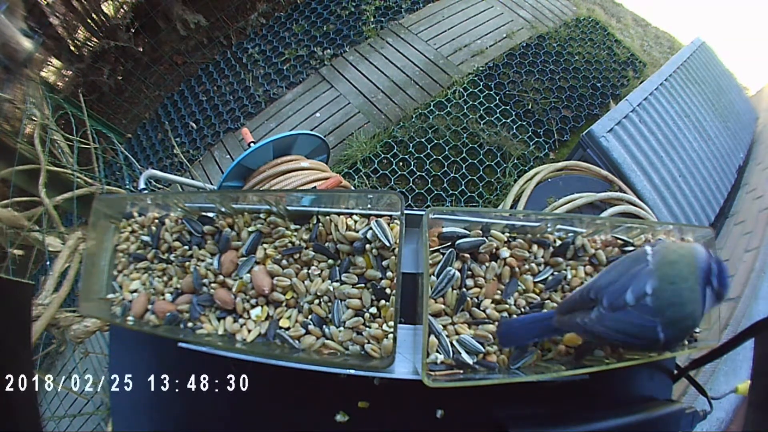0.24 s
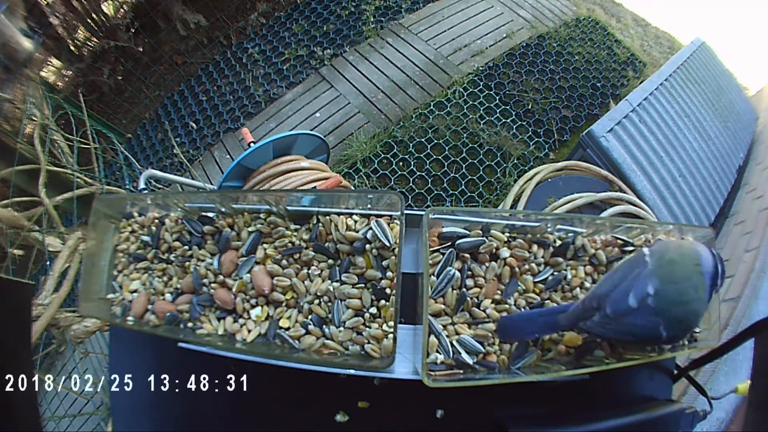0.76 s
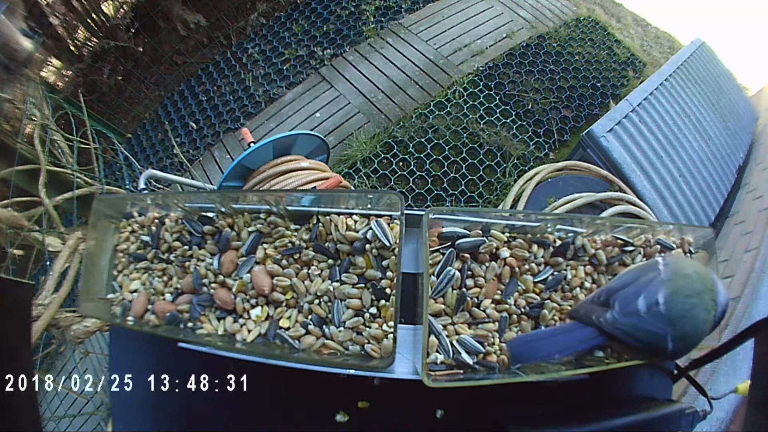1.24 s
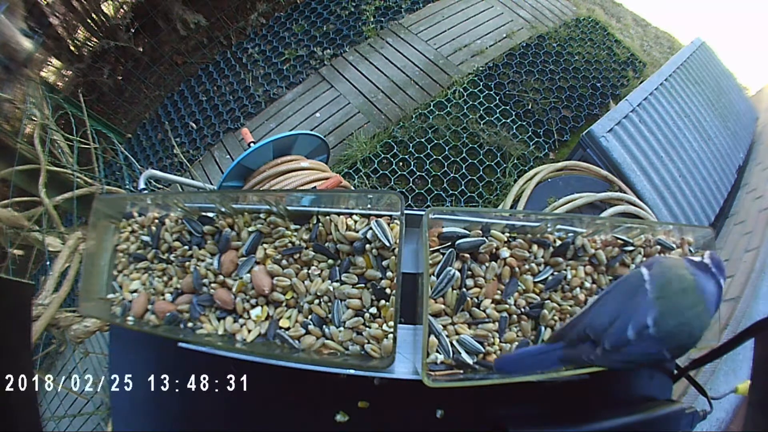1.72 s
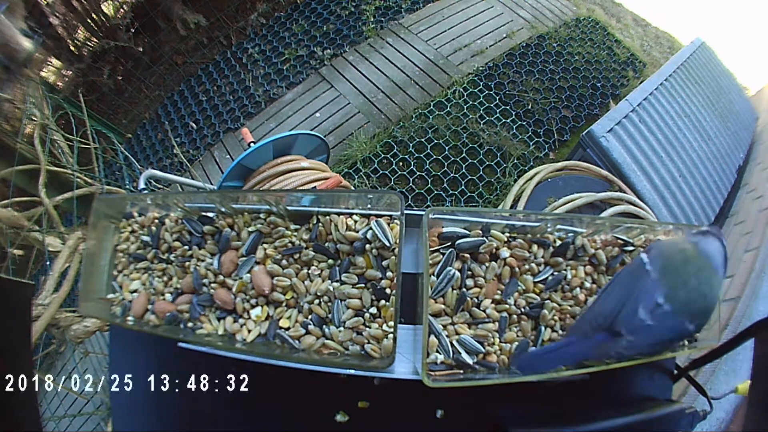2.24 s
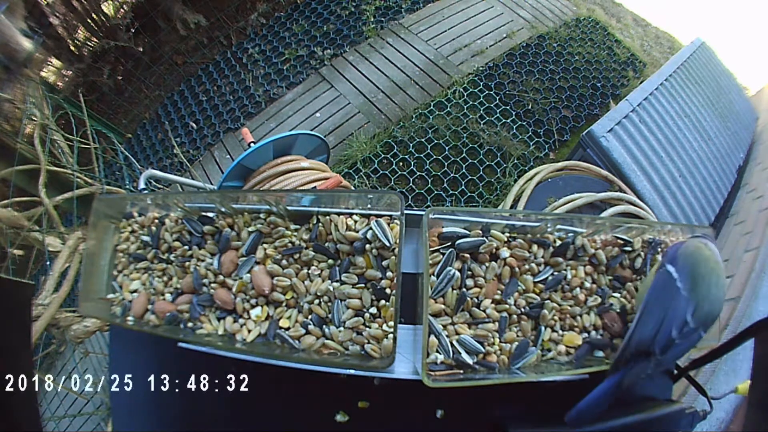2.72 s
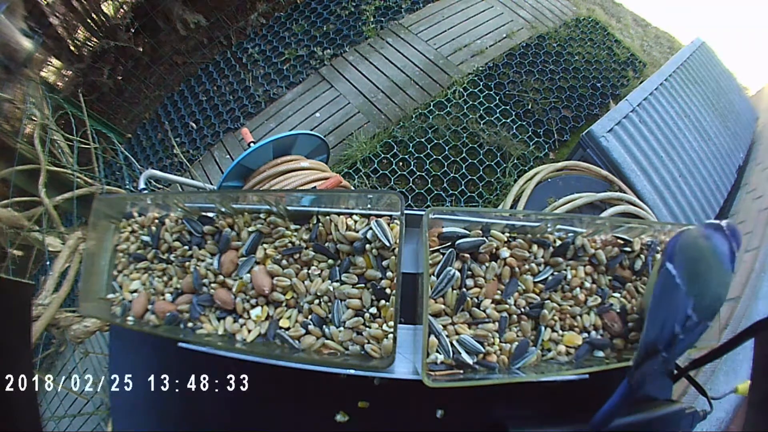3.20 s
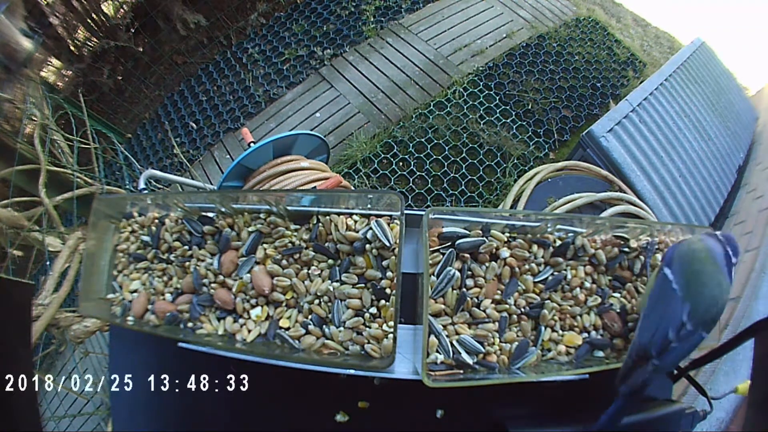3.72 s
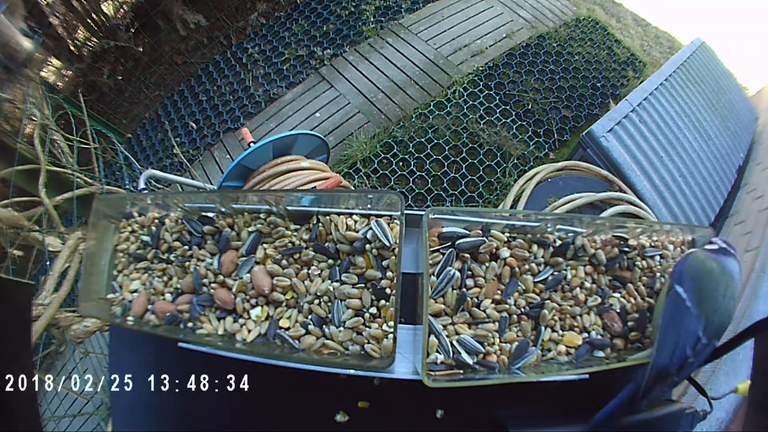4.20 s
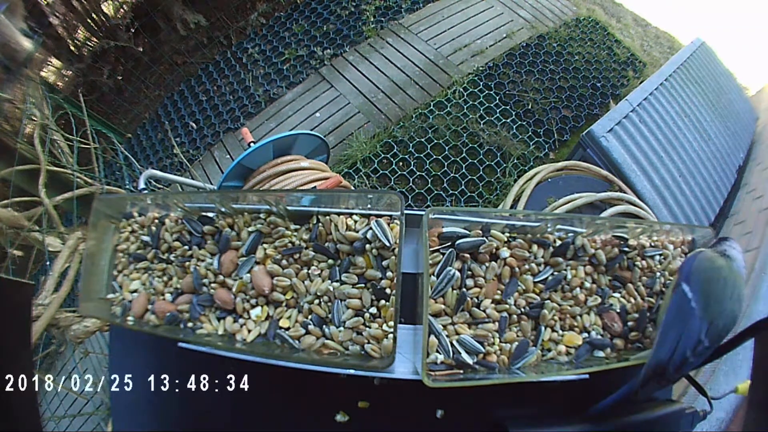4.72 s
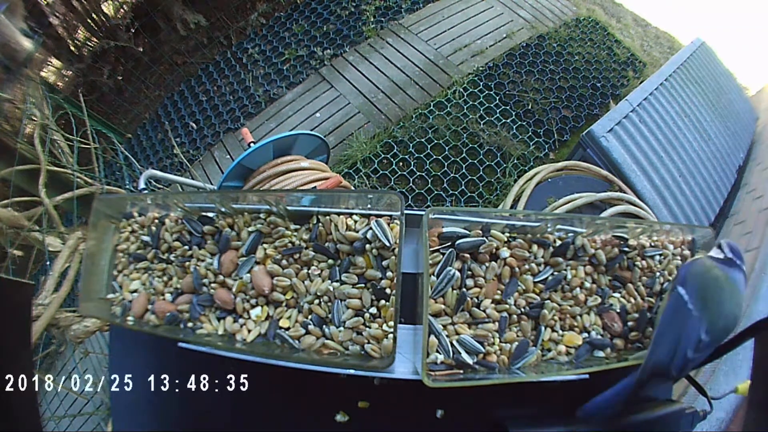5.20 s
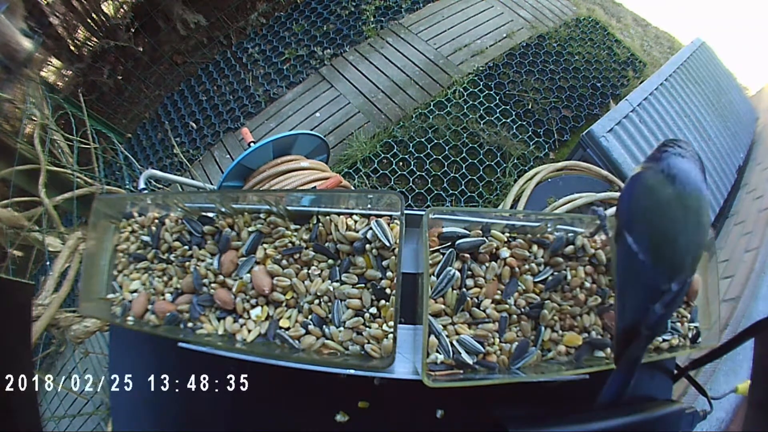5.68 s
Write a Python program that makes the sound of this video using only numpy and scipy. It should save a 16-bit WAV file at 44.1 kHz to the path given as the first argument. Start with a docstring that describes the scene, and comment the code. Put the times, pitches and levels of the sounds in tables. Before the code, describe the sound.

Outdoors at a garden feeder, very close microphone. Low wind rumble and far traffic with faint hiss. A small bird taps a plastic tray sparsely, then gives one very loud hard knock just before two seconds. Gusts buffet, light ticks follow, and a dense clatter of hopping ends with a tiny thin call and squeak.

```python
"""Wind buffets a single microphone as noise in two bands, over far traffic, hiss and a chattering sizzle.
A small bird pecks and hops on plastic seed trays: each contact excites damped modes of the tray.
Near 1.8 s the hardest peck overloads the input and rocks the feeder, a decaying slow sine.
Near 2.9 s a gust moans in the hollow feeder, as band-limited noise; near 5.3 s a hop rocks it again.
At 5.56 s the bird gives one thin call, a gliding tone, while a sliding claw squeaks below it."""
import sys
import numpy as np
from scipy import signal
from scipy.fft import rfft, irfft, next_fast_len
from scipy.io import wavfile
from scipy.ndimage import uniform_filter1d, map_coordinates

SR = 44100
rng = np.random.default_rng(int(sys.argv[2]) if len(sys.argv) > 2 else 0)


def file_out(sig):
    """Save sig as 16-bit WAV at sys.argv[1]."""
    # one column per channel
    cols = np.atleast_2d(sig).T
    # limit, then scale
    lim = np.clip(cols, -1, 1)
    pcm = np.round(lim * 32767).astype(np.int16)
    wavfile.write(sys.argv[1], SR, pcm)


N = 262395

# Contacts of bill, claws and seeds. Each row: start in seconds, peak of the rim modes in dB, then
# weight, hollowness, snap, hardness and tick in dB, and ringing time as a share of the free tray's.
TAPS = [(0.2475, -39, -9, -4, -5, -19, -14, 0.71), (0.345, -47, -7, -4, -13, -1, 7, 1),
        (0.6675, -38.5, -12, -6, -13, -19, -20, 1), (0.9174, -32, -10, -11, -9, -8, 1.5, 0.5),
        (0.951, -36, -18, -8, -7, -7, -3.5, 0.98), (1.0998, -23, -3, -0.5, -22, -15.5, -21, 0.29),
        (1.1065, -21.5, -25, -9, -20, -19, -17, 0.53), (1.1274, -44, 2, -17, -18, -14, -18, .8),
        (1.155, -47, -2, -4, -22, -19, -19, 0.9), (1.2898, -15.5, -7, -5.5, -13, -21.5, -16.5, 0.5),
        (1.2978, -33, 2, -7, -14, -18, -15, .7), (1.3838, -14, -9, -8, -14, -25.5, -22.5, 0.49),
        (1.7818, -29.5, -7, 6, 5, 2, -2.5, 1), (1.792, 3, -24, -0.5, -9.5, -18, -21.5, 0.98),
        (1.818, -17.5, -22, -14, -7, -3.5, -5, 0.76), (1.8284, -36, -26, -20, -14.5, -10.5, -15, 0.62),
        (2.2838, -28, -30, -24, -9, -19, -18.5, .9), (2.2923, -22.5, -24.5, -21.5, -11.5, -17.5, -7.5, .85),
        (2.354, -28, -8, -14, -2.5, -23, -22, 1), (2.3604, -30.5, -9, -23, -4, -11, -16.5, 0.81),
        (2.7535, -25, -15, 3, -26, -35, -35, 0.76), (2.7831, -37, 6.5, 2.5, -17, -16, -15.5, 0.61),
        (2.915, -19.5, -18, 9.5, -12.5, -28, -30.5, 0.78), (2.9628, -55, -7.5, -11.5, -15, -23, -26, .9),
        (3.692, -29, -10, -4, -7, -20.5, -18, 1), (3.9105, -43, 8, 6, -4, -20, -18, 0.99),
        (4.059, -39, -1, -12, -20, -25, -25, 1), (4.171, -41.5, 6, 1, -5, -28, -27, .9),
        (4.2363, -48, -13, -5, -6, -15, -16, .85), (4.36, -42.5, -11, 2, -4, -18, -18, 0.76),
        (4.3916, -39, -4, -3, -26, -28, -26, 0.71), (4.543, -33.5, 6, -1, -6.5, -16, -22, 0.54),
        (4.7518, -47.5, -5, -5, 0, -4, -12, 0.74), (4.7779, -44.5, 11, 2, -10, -17, -19, 0.95),
        (4.8223, -41.5, 8.5, -5, -3, -16, -20, 0.81), (5.027, -40, -4, -1, -7, 1.5, -5, 0.66),
        (5.0483, -47, -4, 3, -9, -7, 2.5, .8), (5.1376, -31.5, -0.5, -4.5, -8.5, -14, -17, 0.73),
        (5.2624, -25.5, -8, 5, -8, -22, -11, 1), (5.2785, -38, -7, 13, -2, -7, -8.5, 1),
        (5.3005, -44, -10, 2, -8, -6, -2, .8), (5.3059, -19, -21, -14, -12, -2, -2, 0.61),
        (5.3182, -22.5, -19, 11, -1, -10, 1, 0.49), (5.3214, -5, -19, -1.5, -22, -15.5, -21, 1),
        (5.3472, -21, 0.5, 8.5, -18, -25, -27, 1), (5.3561, -17.5, 3, -13, -14, -17, -18, 0.87),
        (5.383, -18, -4, -10, -4.5, -10, -8, 0.99), (5.3961, -18, -8, -11, -14, -19, -9, 0.62),
        (5.403, -16.5, -14, -14, -17, -27, -26, 0.82), (5.4068, -40, -11, -9, -7, 0, -2, 0.45),
        (5.4199, -32, -12, -8, -9, -11, -6, 0.65), (5.4435, -46, -8, -1, 4, -8, 0, 0.89),
        (5.4714, -14, -14, -6.5, 8.5, 3.5, -6, 0.56), (5.4764, -10.5, -10, -9.5, 5.5, 1, -11.5, 0.61),
        (5.5268, -38, -15, -10, -16, -13, -14, 0.83), (5.532, -47, -8, -8, -16, -12, -13, .8),
        (5.578, -43.5, -10, -4, 9, 9, 12.5, 1), (5.5936, -26, 7, -6.5, -8, -22, -17, 0.54),
        (5.6054, -54, -2, -5, -3, -4, 8.5, .8), (5.6131, -34, 4, 3.5, -16, -22, -16.5, 0.69)]
# Claws and husks dragged over the plastic. Each row: start in seconds, length in seconds,
# rms of the rim modes in dB, then weight, hollowness and hardness in dB.
SCRAPES = [(0.884, 0.068, -54, 0, -19, -11), (1.764, 0.059, -43.5, -14, -5, -4),
           (1.787, 0.02, -29, -21, -8, -17), (1.825, 0.022, -47.5, 1, -12, -12),
           (2.349, 0.042, -46.5, 1, -7, -21.5), (2.86, 0.13, -48, -10, 3, -23),
           (3.644, 0.085, -56.5, -2, 8, -9), (3.888, 0.058, -61, 12.5, 11, -8),
           (4.051, 0.038, -50.5, -3, -1.5, -23.5), (4.161, 0.024, -52, -10, -2, -20),
           (4.192, 0.07, -53.5, -11, 2.5, -15), (4.349, 0.027, -54, -9, -1, -15),
           (4.761, 0.13, -57.5, 9, 1, -15), (4.997, 0.05, -51.5, 5.5, 1, -11),
           (5.402, 0.031, -47, -1, -1, -10), (5.431, 0.075, -57.5, 11, 0, 4),
           (5.245, 0.033, -47, 5, -6, -10.5), (5.28, 0.025, -40, -20, -5, -10),
           (5.3, 0.017, -35, -5, 1, -2), (5.326, 0.051, -37.5, 2.5, -8, -15.5),
           (5.387, 0.017, -43, -4, 7, -2), (5.551, 0.046, -42, -9, -14, -14),
           (5.601, 0.029, -53, 10, -4, -4)]
# Modes of the free tray. Each row: frequency in Hz, level within its family in dB,
# time to decay by 60 dB in seconds.
TRAY_MODES = [(215, -11.5, 0.03), (376, -10.5, 0.03), (507, -4, 0.019), (610, -9, 0.033),
              (746, -4.5, 0.015), (1101.4, 0, 0.041), (1397, -13, 0.041), (1694, 1, 0.019),
              (1892, -1.5, 0.012), (1970, 0.5, 0.016), (2194, 2.5, 0.015), (2400, -3, 0.021),
              (2836, -14.5, 0.016), (3350, -12.5, 0.011), (3863, 1, 0.0062), (3920, -1.5, 0.0096),
              (4300, -8.5, 0.0052), (4760, -7, 0.0046), (5250, -3.5, 0.004), (5840, 0.5, 0.007),
              (6300, -3, 0.011), (6900, -1, 0.0057), (7270, -1.5, 0.0054), (7390, 1, 0.0049),
              (10340, 7.5, 0.0027), (11470, 2.5, 0.0032), (11100, 6.5, 0.002), (12600, -4.5, 0.0022)]
# Edges in Hz between the families of modes: thud, ring, wall, rim, snap, click and tick.
FAMILY_EDGES_HZ = [850, 1300, 1950, 3000, 5000, 8000]
# Time constant in ms of the rise of each family; the hollow ring builds up late.
SWELL_MS = [0.44, 1.88, 0.18, 0.22, 0.36, 0.17, 0.029]
# Drive of each family by the chatter of a 0 dB touch, in dB relative to the first push.
# Slow modes feel a touch as one push, quick ones feel its chatter.
CHATTER_DB = [-46, -52, -38, -34, -29, -28, -28]
# Initial drive of each family by rattling seeds, in dB relative to the first push.
RATTLE_DB = [-29.5, -53, -29.5, -28.5, -37, -36.5, -32]
# How a family follows a control. Each: constant in dB, share of the control (a ratio).
WALL_FOLLOWS_HOLLOWNESS = (0, 0.67)
CLICK_FOLLOWS_HARDNESS = (0.9, 0.93)
DRAG_SNAP_FOLLOWS_HARDNESS = (-1.2, 0.43)
DRAG_TICK_FOLLOWS_HARDNESS = (-0.77, 0.94)
# Rocking of the feeder. Each row: start in seconds, initial level in dB, frequency in Hz.
JOLTS = [(1.834, -13.5, 15.8), (5.339, -7, 19)]
# Bird call, then squeak of a claw sliding to rest. Each row: time in seconds,
# centre of the pitch in Hz, centre of the rms level in dB.
CALL = [(5.558, 6575, -65), (5.566, 7451, -48), (5.572, 7640, -43), (5.586, 7713, -46), (5.598, 7357, -40),
        (5.605, 6902, -63)]
SQUEAK = [(5.562, 3800, -41), (5.569, 3330, -32), (5.574, 3350, -43), (5.578, 2710, -45),
          (5.584, 2290, -28.5), (5.592, 2200, -55)]
# Moan of the feeder in a gust. Each row: time in seconds, rms level in dB.
MOAN = [(2.83, -77), (2.865, -36.5), (2.92, -41), (2.96, -45), (3.02, -53), (3.06, -70)]
# Gusts. Each row: time in seconds, buffet level in dB, flutter in dB relative to the buffet.
WIND = [(0.0, -37.5, 0), (0.23, -22, -11), (0.46, -45.5, 6), (0.49, -23, -11.5), (1.03, -24, -15.5),
        (1.35, -40, 2.5), (1.74, -24.5, -11), (2.17, -22, -7.5), (2.22, -13, -6.5), (2.28, -30, -8),
        (2.77, -24, -11.5), (2.835, -17.5, -7), (2.872, -16, -16.5), (2.94, -14, -9), (2.98, -29, -6),
        (3.04, -18.5, -5), (3.1, -28.5, -2.5), (3.148, -11.5, -3), (3.194, -21, -1.5), (3.25, -10, -6),
        (3.32, -26.5, -1), (3.35, -20, -6.5), (3.42, -37, -3), (3.5, -19, -14), (3.58, -29, -10.5),
        (3.75, -15, -18), (3.84, -32, -7.5), (4.24, -23.5, -13.5), (4.57, -39.5, 0), (4.96, -34, -11),
        (5.01, -21.5, -9), (5.31, -28, 0.5), (5.36, -23, -3), (5.44, -23.5, -19), (5.59, -38.5, -7),
        (5.9, -41.5, 1)]
# Noise spectra, of which only the shape counts. Each row: frequency in Hz, relative density in dB per Hz.
MOAN_BAND = [(220, -48.5), (320, -3), (380, -3), (450, -1.5), (520, -9), (700, -65)]
BUFFET = [(1.8, -32), (3.0, -4.5), (32, 8), (47, -5), (70, -10), (91, -36), (150, -120)]
FLUTTER = [(32, -77), (55, 4.5), (113, -11.5), (161, -20), (230, -31), (300, -40.5), (390, -49.5),
           (660, -120)]
TRAFFIC = [(59, -3), (100, -8), (141, -5), (167, -9.5), (287, -7), (544, -5.5), (858, -16.5), (1050, -6.5),
           (1140, -17.5), (1560, -16.5), (1700, -12), (1820, -13.5), (1960, -15.5), (2320, -24),
           (3000, -34.5), (3900, -62.5), (6600, -120)]
HISS = [(1470, -35), (2500, -8.5), (2780, -2), (3100, -1), (5540, -5), (6080, -3.5), (6610, -5.5),
        (7760, -8.5), (11600, -10.5), (13700, -9), (14400, -19.5), (15600, -20)]
SIZZLE = [(8500, -37), (9400, -10.5), (9900, 2), (10300, -11), (11000, -6), (11800, -20), (12400, -8),
          (12900, -1.5), (13600, -1.5), (14100, -7.5), (14800, -21.5)]
# Rises of the sizzle. Each row: start in seconds, length in seconds, gain over its rest in dB.
SIZZLE_SPELLS = [(1.062, .63, 17), (3.268, 0.66, 18.5), (5.396, 0.73, 17.5)]
# Faint difference between the channels in loud moments. Each row: frequency in Hz, level relative to the sound
# common to both channels in dB.
WIDTH_DB = [(60, -70.5), (200, -44.5), (600, -22.5), (2400, -20), (8000, -16.5), (15000, -2)]

CONTACT_MS = 0.37  # time constant of a 0 dB touch
SOFTER_PER_DB = 0.08  # weaker touches are softer: they last longer and chatter more
RATTLE_T60_S, ROCK_T60_S = 0.046, 0.33
SETTLE_S = 0.028  # the bird's weight settles on the tray and chokes what still rings
SOFT_HZ = 14200  # the tray radiates little above this
LUMPS_DB, LUMPS_PER_S = 2.5, 10  # single eddies swell and sink around the gusts
TRAFFIC_DB = -44.5
HISS_DB, SIZZLE_DB = -60, -76.5  # before the treble gain; sizzle also before spells and bursts
THINNING_AT_DB = -18  # level of the wandering curve around which the treble gain turns down
BURST_S, BURST_MID_S, CLICKS_PER_BURST = .04421, 1.4379, 11  # cycle, centre of one burst, clicks a cycle
BURST_SHARE, BUZZ_DEPTH = 0.72, 0.41  # part of each cycle that sounds, depth of the clicks
PAUSE_DB = -9  # pauses relative to bursts
OFFSET = 0.042  # converter offset, share of full scale
TOP_HZ = 15730


def taps():
    """Impact excitation: a first push, a chatter of force during contact, then a brief rattle of loose seeds."""
    out = np.zeros(N + SR)
    t = np.arange(SR // 16) / SR
    rattle = amp(np.transpose([RATTLE_DB]) - 60 * t / RATTLE_T60_S)
    for start, db, weight_db, hollow_db, snap_db, hard_db, tick_db, ringing in TAPS:
        softness = np.exp(-SOFTER_PER_DB * db)
        contact_s = softness ** .5 * CONTACT_MS / 1000
        chatter = amp(np.transpose([CHATTER_DB])) * softness * np.exp(-(t / contact_s) ** 2)
        force = rng.standard_normal(len(t)) * (chatter + rattle)
        force[:, 0] += 1  # the first push
        rows = signal.fftconvolve(families(ringing), force, axes=1)
        rows /= np.abs(rows).max(axis=1, keepdims=True)
        sound = amp(db + colour(weight_db, hollow_db, snap_db, hard_db, tick_db)) @ rows
        out[round(start * SR):][:len(sound)] += sound
    return out[:N]


def scrapes():
    """Stick-slip friction: a drag is a dense uneven run of tiny slips under one stroke."""
    out = np.zeros(N + SR)
    for start, length, db, weight_db, hollow_db, hard_db in SCRAPES:
        n = round(length * SR)
        unevenness = amp(6.5 * np.minimum(rng.exponential(size=n), 4))
        slips = rng.standard_normal(n) * unevenness * np.sqrt(np.hanning(n))
        rows = signal.fftconvolve(families(ringing=0.43), slips[None], axes=1)
        rows /= np.sqrt(np.sum(rows ** 2, axis=1, keepdims=True) / n)
        snap_db = follow(DRAG_SNAP_FOLLOWS_HARDNESS, hard_db)
        tick_db = follow(DRAG_TICK_FOLLOWS_HARDNESS, hard_db)
        sound = amp(db + colour(weight_db, hollow_db, snap_db, hard_db, tick_db)) @ rows
        out[round(start * SR):][:len(sound)] += sound
    return out[:N]


def families(ringing):
    """Modal superposition: the tray's answer to one blow is a sum of damped sines, one row a family.

    The spot struck shifts strengths and pitches; the bird's grip shortens the ringing."""
    hz, db, t60 = np.transpose(TRAY_MODES)[:, :, None]
    family = np.searchsorted(FAMILY_EDGES_HZ, hz[:, 0])
    t = np.arange(SR // 20) / SR
    level_db = 1.5 * rng.standard_normal(hz.shape)
    shift = .006 * rng.standard_normal(hz.shape)
    swell = (1 - np.exp(-t / (np.array(SWELL_MS)[family, None] / 1000))) ** 2
    decay = amp(db + level_db - 60 * t / (t60 * ringing))
    choke = np.exp(-(t / SETTLE_S) ** 2)
    sign = (-1) ** np.arange(len(hz))[:, None]  # neighbours in opposite phase fill the valleys between them
    modes = sign * decay * swell * choke * np.sin(2 * np.pi * hz * (1 + shift) * t)
    membership = family == np.arange(len(SWELL_MS))[:, None]
    return membership @ modes


def colour(weight_db, hollow_db, snap_db, hard_db, tick_db):
    """Selective excitation: levels relative to the rim; weight feeds the thud, hollowness ring and wall."""
    wall_db = follow(WALL_FOLLOWS_HOLLOWNESS, hollow_db)
    click_db = follow(CLICK_FOLLOWS_HARDNESS, hard_db)
    return np.array([weight_db, hollow_db, wall_db, 0, snap_db, click_db, tick_db])


def follow(law, db):
    """Linear law: a constant plus a share of the controlling level."""
    constant_db, share = law
    return constant_db + share * db


def jolts():
    """Damped oscillation: the hardest peck and the hop set the whole feeder swinging, a dying slow sine."""
    start, db, hz = np.transpose(JOLTS)[:, :, None]
    t = np.maximum(np.arange(N) / SR - start, 0)
    return np.sum(amp(db - 60 * t / ROCK_T60_S) * np.sin(2 * np.pi * hz * t), axis=0)


def call():
    """Frequency modulation: one thin arched whistle, over the rough falling squeak of a sliding claw."""
    return glide(CALL, rough=.02) + glide(SQUEAK, rough=1.1)


def glide(rows, rough, shake=450):
    """Phase is the integral of frequency: a tone follows the rows; roughness shakes its pitch and size."""
    hz, db = curves(rows)
    t = np.arange(N) / SR
    first, last = rows[0][0], rows[-1][0]
    gate = np.clip(np.minimum(t - first, last - t) / 0.0034, 0, 1)
    phase = 2 * np.pi * np.cumsum(hz * (1 + .08 * rough * wobble(shake))) / SR
    return np.sqrt(2) * amp(db + 3.2 * rough * wobble(shake)) * gate * np.sin(phase)


def moan():
    """Cavity resonance: the gust blows across the hollow feeder, heard as a low diffuse band of noise."""
    return amp(curves(MOAN)[0]) * rush(MOAN_BAND, patchy_db=0.0)


def wind():
    """Turbulent pressure: eddies push the diaphragm slowly, and a faster flutter rides on the buffets."""
    buffet_db, flutter_db = curves(WIND)
    flutter = unit(amp(2.0 * wobble(15)) * rush(FLUTTER, patchy_db=1.8))
    buffet = unit(amp(LUMPS_DB * wobble(LUMPS_PER_S)) * rush(BUFFET, patchy_db=0.5))
    return amp(buffet_db) * (buffet + amp(flutter_db) * flutter)


def traffic():
    """Resonant filtering: far traffic drones through the feeder's hollow resonances, as peaks of a noise."""
    return amp(TRAFFIC_DB + 1.3 * wobble(5.99)) * rush(TRAFFIC, patchy_db=1.0)


def hiss():
    """Stationary noise: a faint hiss of steady level."""
    return amp(HISS_DB) * rush(HISS, patchy_db=2.3)


def sizzle():
    """Amplitude modulation: thin treble noise chatters in bursts and rises for three spells."""
    t = np.arange(N) / SR
    spells_db = np.zeros(N)
    for start, length, db in SIZZLE_SPELLS:
        spells_db += db * np.clip(np.minimum(t - start, start + length - t) / 0.019, 0, 1)
    return amp(SIZZLE_DB + spells_db + 1.7 * wobble(30)) * click_bursts() * rush(SIZZLE, patchy_db=2.0)


def click_bursts():
    """Periodic gating: bursts of fast regular clicks with short pauses, on a steady clock, as a gain."""
    cycle = (np.arange(N) / SR - BURST_MID_S) / BURST_S
    from_centre = np.abs((cycle + .5) % 1 - .5)
    inside = np.clip((BURST_SHARE / 2 - from_centre) / .04, 0, 1)
    buzz = 1 + BUZZ_DEPTH * np.cos(2 * np.pi * (CLICKS_PER_BURST * cycle + .25))
    return amp(PAUSE_DB * (1.5 - inside)) * buzz


def treble_gain():
    """Level-dependent gain: thins the treble unevenly at high levels of the wind curve."""
    wandering_db = curves(WIND)[0] + 5.7 * wobble(22)
    return amp(-26 / (1 + amp(-9 * (wandering_db - THINNING_AT_DB))))


def background():
    """Superposition: far traffic, hiss and a chattering sizzle sound together."""
    return traffic() + treble_gain() * (hiss() + sizzle())


def rush(spectrum, patchy_db):
    """Spectral shaping: coloured noise of rms 1 with patches of random gain in time and frequency."""
    z = signal.stft(rng.standard_normal(N), nperseg=512)[2]
    field = uniform_filter1d(rng.standard_normal(z.shape), size=6, axis=0)
    field = uniform_filter1d(field, size=8, axis=1)
    patchy = signal.istft(z * amp(patchy_db * unit(field)), nperseg=512)[1][:N]
    return unit(filtered(patchy, lambda hz: amp(along(spectrum, hz))))


def filtered(x, response):
    """Convolution theorem: multiply the spectrum of x by a response of frequency."""
    m = next_fast_len(N + 8192)
    return irfft(rfft(x, m) * response(np.fft.rfftfreq(m, 1 / SR)), m)[..., :N]


def wobble(rate):
    """Smooth interpolation: a random curve with rate knots a second."""
    knots = rng.standard_normal(int(N * rate / SR) + 4)
    return map_coordinates(knots, [np.arange(N) * rate / SR])


def curves(rows):
    """Linear interpolation: one value per sample for each column after the time."""
    s, *cols = np.transpose(rows)
    return [np.interp(np.arange(N) / SR, s, c) for c in cols]


def along(points, hz):
    """Logarithmic frequency scale: interpolate (Hz, value) points along it."""
    f, v = np.transpose(points)
    return np.interp(np.log(hz + 1), np.log(f + 1), v)


def amp(db):
    """Decibel law: amplitude ratio of a level."""
    return 10 ** (np.asarray(db) / 20)


def unit(x):
    """Normalisation: scale to an rms of 1."""
    return x / np.sqrt(np.mean(x ** 2) + 1e-20)


def scene():
    """Linear superposition: all sources add at one microphone, the tray's treble rolled off."""
    tray = filtered(taps() + scrapes(), lambda hz: 1 / np.sqrt(1 + (hz / SOFT_HZ) ** 12))
    mono = tray + jolts() + call() + moan() + wind() + background()
    return np.array([mono, mono])


def record(dry):
    """Saturation: overload, a faint difference between the channels in loud moments, band limit and offset."""
    clipped = dry / (1 + np.abs(dry / .95) ** 8) ** (1 / 8)
    hz, _, z = signal.stft(clipped[0], SR, nperseg=512)
    loud_frame = np.linalg.norm(z, axis=0) > amp(-25)
    loud_band = uniform_filter1d(np.abs(z), size=8, axis=0) > amp(-72)
    turns = np.exp(2j * np.pi * rng.random(z.shape))  # random phases make the difference between the channels noise-like
    width_z = z * (loud_frame & loud_band) * turns * amp(along(WIDTH_DB, hz))[:, None]
    width = signal.istft(width_z, SR, nperseg=512)[1][:N]
    return OFFSET + filtered(clipped + width * [[1], [-1]], lambda hz: hz < TOP_HZ)


dry = scene()
out = record(dry)
file_out(out)
```